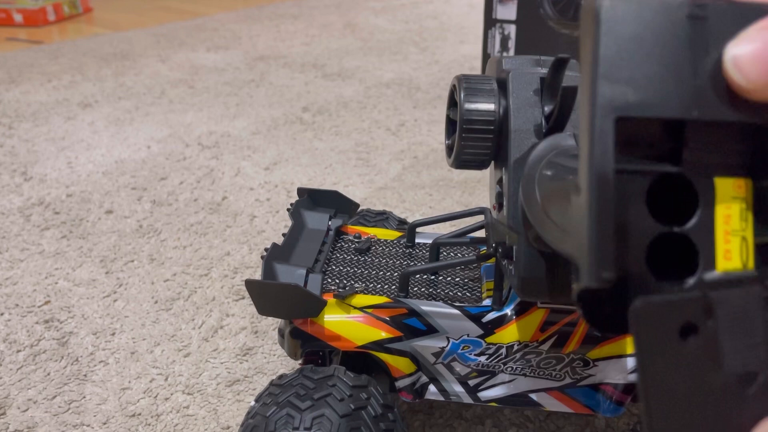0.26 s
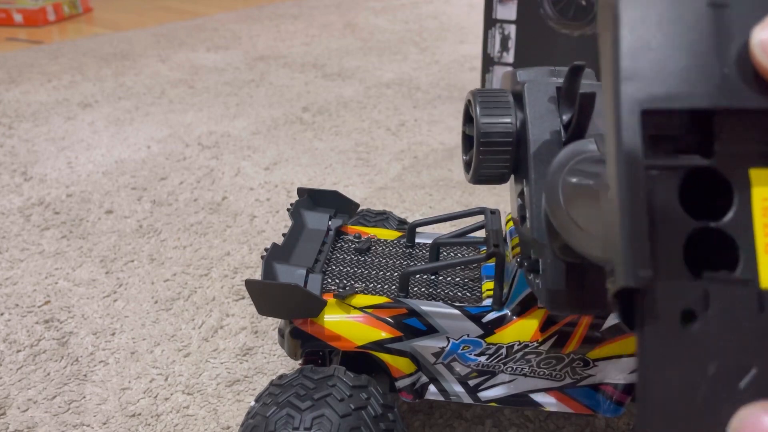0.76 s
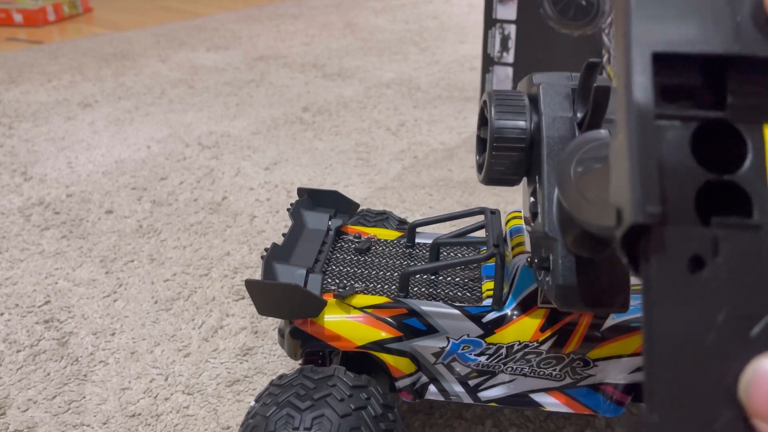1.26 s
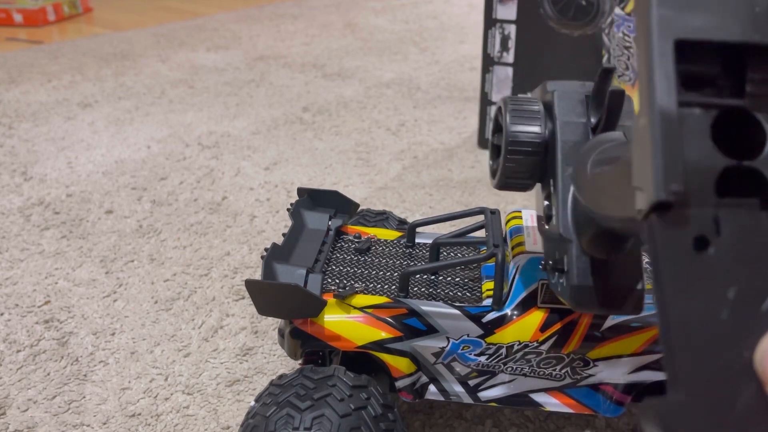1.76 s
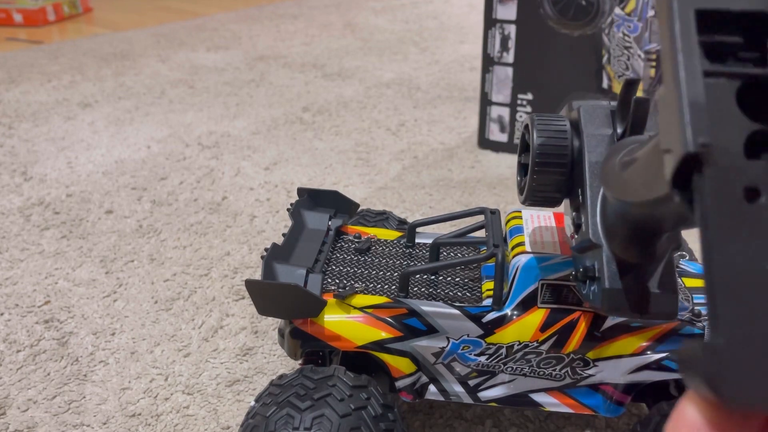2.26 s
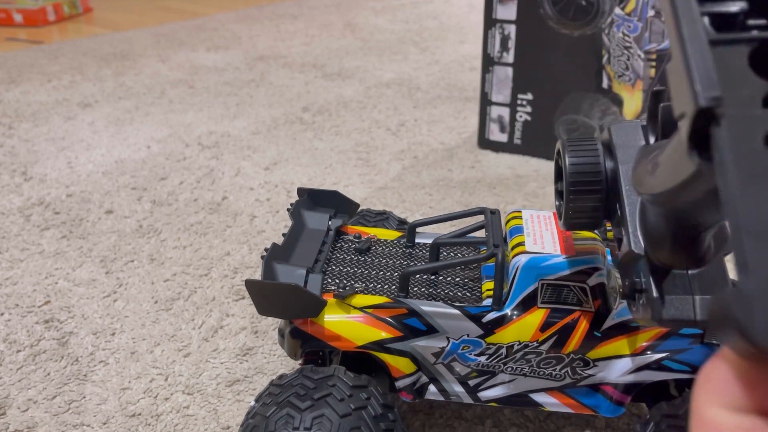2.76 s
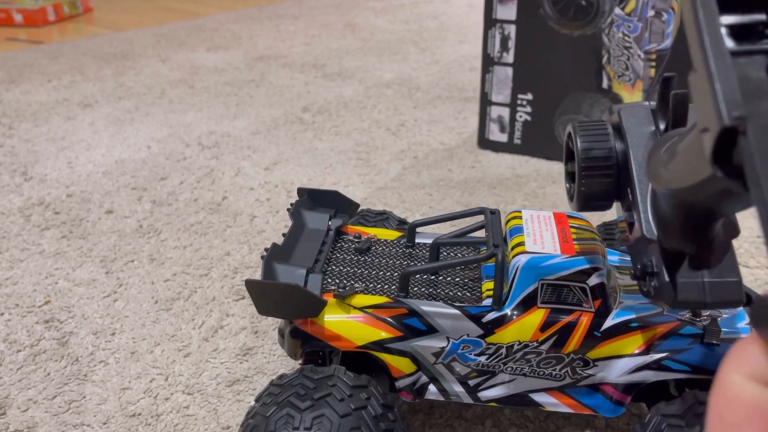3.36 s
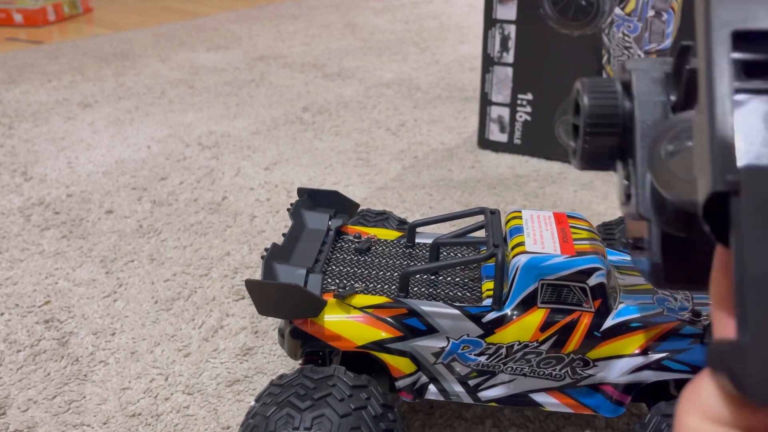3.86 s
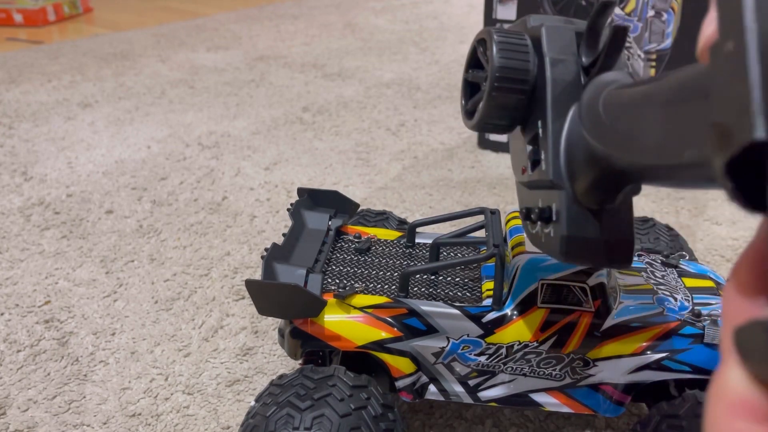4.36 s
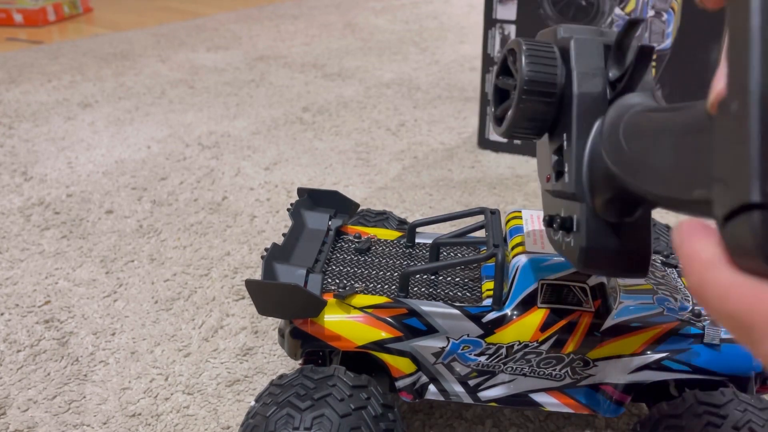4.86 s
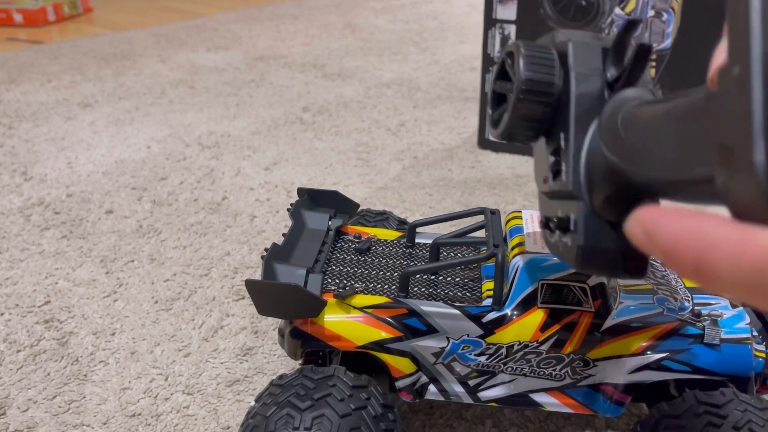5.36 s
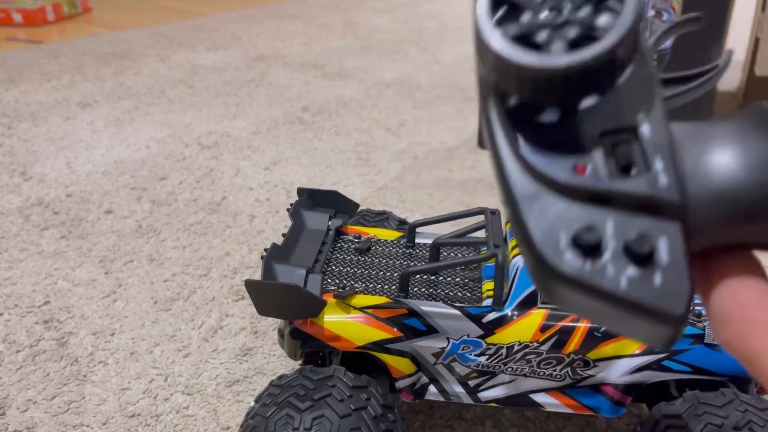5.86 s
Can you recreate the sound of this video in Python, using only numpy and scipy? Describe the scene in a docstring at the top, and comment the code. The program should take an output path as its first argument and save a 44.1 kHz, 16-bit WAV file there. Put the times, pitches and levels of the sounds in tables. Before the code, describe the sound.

Hands turn a hollow plastic toy controller, with small clicks and rubbing, until its battery lid releases with one loud crack.

```python
"""A quiet carpeted room: close by, hands turn a hollow plastic toy controller and work its battery lid off.
The shell snaps and ticks, fingers and lid slide over it, and the latch lets go with one loud crack.
Each contact is a force that rings the damped modes of the plastic.
Behind it: soft far thumps, ventilation hum and hiss, and a low rumble."""
import sys
import numpy as np
from scipy import signal
from scipy.fft import rfft, irfft, next_fast_len
from scipy.io import wavfile

SR = 44100
rng = np.random.default_rng(int(sys.argv[2]) if len(sys.argv) > 2 else 0)


def to_wav(sig):
    """Store sig (one row per channel, or 1-D mono) as 16-bit WAV at the path in sys.argv[1].

    Samples outside -1..1 are clipped; the rate is SR.
    """
    pcm = np.clip(np.atleast_2d(sig), -1, 1) * 32767
    pcm = np.round(pcm).astype(np.int16)
    wavfile.write(sys.argv[1], SR, pcm.T)  # frames by channels


N = 269010
LATCH_S = 5.1478
OFF = -np.inf   # dB: family not driven


def snaps(rings):
    """The shell gives with a click and chatters; weak ticks are longer, duller scuffs."""
    # Each row: time in seconds, level in dB, cavity, case, ribs and edges in dB re walls, pitch ratio.
    events = [(0.4679, -19.5, -7.5, -24, 0, -7, 0.93), (0.4747, -33.5, -3, 1, -8, -15, 0.88),
              (0.6082, -24, -5, -11, 5, 4, 0.91), (0.6263, -28, -3.5, -9.5, 4, -3, 0.88),
              (0.6425, -48, 8, -2, 2, 3, 1.052), (0.6927, -26.5, -12, -18, 4, 5, 0.94),
              (0.7339, -35.5, 8.5, -1, -3, -4, 0.91), (0.7412, -37, 8.5, -6, -2, -8, 1.1),
              (0.7507, -33.5, 3, -4, -1.5, 1.5, 0.88), (0.7681, -40, 7.5, 9.5, -1.5, -5, 1.04),
              (0.8663, -56, 6, 9, -12, -12, 1.02), (0.9993, -48, 6, 3.5, -8, -5, 0.99),
              (1.021, -38, 5, 3, -4, -7, 0.93), (1.0436, -27, 1, 9, -7, -11.5, 1),
              (1.084, -45.5, 4, -13, -10, -1, 1), (1.1611, -50, 4, 4.5, 1.5, -5.5, 0.96),
              (1.2192, -47, 5.5, 7, -2, -3.5, 1.02), (1.288, -52, -0.5, 8, 0.5, -6, 0.88),
              (1.3401, -55, 4, 6.5, -0.5, -1.5, 1), (1.5823, -39.5, 0, 2, -14, -10.5, 1.02),
              (1.6323, -43, -16, -5, -3, -13, 1.03), (1.709, -58, 11, 9.5, -9.5, -26, 0.89),
              (1.732, -36.5, -8, -22, -8.5, -13.5, 1.23), (1.7574, -56, 4.5, 6, -1.5, 4.5, 1),
              (1.8173, -50, -1, -12.5, 1.5, -5.5, 0.94), (1.8342, -40, 5, 8, -4, -5.5, 1),
              (2.052, -63.5, -2.5, -1, -1.5, 7, 1.04), (2.1313, -45.5, -0.5, -1, -4.5, -3, 0.99),
              (2.2825, -43, 10.5, -6, -6, -6, 1.02), (2.3929, -54, 13, 8, -1.5, -11, 0.92),
              (2.5197, -61, 4, 3, -3.0, 1, 0.92), (2.55, -38.5, 1, 6.5, -2, -9.5, 0.96),
              (2.625, -46.5, 5.5, -1, 5.5, -7, 1.12), (2.6994, -54, -7, 7.5, -2.5, 2, 0.97),
              (2.8165, -57, -1, -16, 4, -4, 1.001), (2.8354, -36.5, -3.5, 3, 0, -2, 0.9),
              (2.8422, -41, -2.5, -4, 3, -3, 1.14), (2.8955, -34.5, -9, -12, 3.5, 6, 0.94),
              (2.9595, -48.5, -1.5, 7.5, -0.5, -14, 1.03), (3.038, -74.5, -6, 8, -7, -13, 1.04),
              (3.4415, -43, -11.5, -20, 2, 3, 0.88), (3.6157, -55.5, -18, 13, -0.5, 0.5, 1.09),
              (3.695, -59, -10.5, 10, 5, 2, 0.98), (3.744, -54, -6, 10, 2, 1, 0.98),
              (3.844, -53, -20.5, -6, -11, 1.5, 1), (4.061, -48, -4, -2.5, 3.5, 4.5, 1.1),
              (4.157, -60, -16, -20, -2, -21, 0.97), (4.251, -49, -9, -6, -1, -6, 1.01),
              (4.2664, -41.5, -25, 1.5, -7, 2.5, 0.99), (4.433, -45, -2, 2, 8, 5.5, 1.04),
              (4.5293, -53.5, -15, 5, 5, 6, 1.28), (4.561, -57.5, -12, -5, 5, 17.5, 0.79),
              (4.602, -55, -8, 7, -4, -6, 1.031), (4.6903, -45, -5, -2.5, -8.5, -2, 0.93),
              (4.717, -47, -1, -8, 2.0, 12, 1), (4.748, -39.5, -7, -13, 9.5, 18, 1.1),
              (4.844, -40, 0.5, -24, 6.5, 11, 0.96), (4.941, -74, -18.5, -11, -4.5, 26, 1.04),
              (5.1465, -16, -2.5, 2, 3.5, -0.5, 1.13), (5.1482, -20.5, -9.5, -7.5, 3, 7.5, 1.0),
              (5.416, -46.5, -4, -20, -15.5, -33, 1), (5.456, -58.5, -12, -14, 3, -6, 1.6),
              (5.7707, -47, 0, 1.5, -4, -1, 0.89), (5.8868, -58, -4, 3.5, 6, 17, 1.06)]
    lead_in_s, chatter_rise_s, chatter_t60_s = .004, .00084, .018
    out, t = np.zeros((2, N)), np.arange(2000) / SR
    lead = round(lead_in_s * SR)
    lead_in = amp(-23 - 18 * np.arange(lead, 0, -1) / lead)   # a faint noise swell leads into each click
    for s, level_db, cavity_db, case_db, ribs_db, edges_db, pitch in events:
        soft = np.clip((-44 - level_db - max(edges_db, 0)) / 21.5, 0, 1)
        age_s = t / (1 + .5 * soft)
        noise = rng.standard_normal(len(t))
        force = .49 * noise * amp(-60 * age_s / chatter_t60_s) * np.minimum(age_s / chatter_rise_s, 1)
        force[44] += 3 * (1 - soft)   # release click, 1 ms in
        force = np.concatenate([lead_in * noise[-lead:], force])
        force = (1 - soft) * force + soft * dull(force)
        colour_db = [0, cavity_db, case_db, ribs_db, edges_db, OFF, cavity_db - 14]
        drive(out, s - lead_in_s, amp(level_db) * force, rings, colour_db, pitch)
    return out


def latch(rings):
    """The latch lets go: one impulse into the edges and the whole lid."""
    out = np.zeros((2, N))
    drive(out, LATCH_S, [1], rings, [OFF, OFF, OFF, OFF, 4.5, OFF, 3])
    return out


def slides(rings):
    """Fingers and lid stroke the shell; micro-slips ring it."""
    # Each row: start, rise, hold and fall in seconds, level in dB,
    # cavity, ribs, edges and grip in dB re walls, pitch ratio.
    strokes = [(.382, 0.1, .001, .01, -61.5, -5.5, -3, 2.5, -13, 1.08),
               (1.023, 0.012, 0.0011, 0.048, -55, 3, -3, 0, -2, 0.92),
               (1.616, 0.014, 0.0093, 0.025, -57.5, 5, -2, 4.5, -6, 1),
               (1.788, 0.037, 0.0012, 0.0064, -61.5, 3, -3, 5, -12, 1.1),
               (2.261, 0.023, 0.0011, 0.015, -61.5, 12.5, 0, 2.5, -11, 1.04),
               (2.461, 0.028, 0.0011, 0.017, -73.5, -9, -2, 12.5, -2, 0.92),
               (2.598, 0.018, .001, 0.19, -72, 5, 1, 8, 0, 1),
               (2.803, 0.021, .001, 0.017, -61.5, -3, 2, 7, -4, 1.05),
               (3.315, 0.016, 0.00073, .03, -75.5, -4, -3, 7.5, -3, 0.9),
               (3.415, 0.031, 0.0074, 0.061, -59, -1.5, -0.5, 10, -3.5, 0.92),
               (3.6, 0.018, 0.033, 0.14, -67.5, -6, 2, 7, -2, 0.97),
               (3.795, 0.0064, 0.011, 0.02, -73.5, -6, -5.5, -2.5, 6, 1.08),
               (3.949, 0.043, .001, .011, -60.5, -5.5, -8, 5.5, 1.5, 1.04),
               (3.993, 0.017, 0.013, 0.0094, -44, -29, -12, 1.5, 6, 1.033),
               (4.146, 0.011, .001, 0.01, -67, -19.5, 0, 12.5, -6, 1.01),
               (4.241, 0.03, 0.0012, 0.012, -60, 2.5, 0, 11.5, 3, 1.1),
               (4.364, 0.056, 0.014, 0.0098, -55.5, -6.5, -6, 14.5, 3, 1.03),
               (4.518, 0.041, .001, 0.14, -70.5, -4, 7, 11, 1, 1.1),
               (4.696, 0.051, 0.018, 0.017, -44, -9.5, 1.5, 11, -0.5, 0.96),
               (5.138, 0.009, 0.00085, 0.0012, -37.5, -10.5, 0, 4, -8, 0.9),
               (5.429, 0.032, .001, 0.018, -66.5, -9, 4, 9, -4, 0.85),
               (5.668, 0.03, 0.036, 0.031, -61, -3.5, -4.5, 8, -3.5, 0.88),
               (5.766, 0.026, .001, 0.072, -62.5, -6.5, 2.5, 12.5, -3, 0.99)]
    out = np.zeros((2, N))
    slips = grit(per_s=4500, spread_db=4.5)
    slips = .45 * slips + .55 * dull(slips)
    for start_s, rise_s, hold_s, fall_s, level_db, cavity_db, ribs_db, edges_db, grip_db, pitch in strokes:
        corners_s = np.cumsum([0, rise_s, hold_s, fall_s])
        stroke = np.interp(np.arange(round(corners_s[-1] * SR)) / SR, corners_s, [0, 1, 1, 0])
        force = amp(level_db) * stroke * slips[round(start_s * SR):][:len(stroke)]
        colour_db = [0, cavity_db, cavity_db + 1.5, ribs_db, edges_db, grip_db, OFF]
        drive(out, start_s, force, rings, colour_db, pitch)
    return out


def rubbing(rings):
    """Skin rubs faintly on the shell with fine, dense slips."""
    # Each row: time in seconds, level in dB.
    level_curve = [(0.0, -96.5), (0.41, -95.5), (0.5, -71), (0.78, -73.5), (0.9, -83.5), (1.15, -83),
                   (1.22, -77), (1.4, -90), (1.75, -79), (1.9, -92), (2.15, -82.5), (2.4, -87.5),
                   (2.9, -82), (3.05, -92), (3.46, -91.5), (3.75, -81), (3.9, -87), (4.06, -77),
                   (4.2, -85.5), (4.5, -85), (4.79, -67.5), (4.9, -87.5), (5.14, -88.5), (5.2, -71.5),
                   (5.3, -63.5), (5.5, -75), (5.62, -77.5), (5.86, -72.5), (5.92, -71), (6.04, -75.5),
                   (6.1, -95)]
    # Gains in dB on walls, cavity, case, ribs, edges, grip.
    colour_db = [-1, -8.5, -3.5, -4, 4, -0.5]
    out = np.zeros((2, N))
    level_db = np.interp(np.arange(N) / SR, *np.transpose(level_curve))
    drive(out, 0, amp(level_db) * dull(grit(per_s=12000, spread_db=2)), rings, [*colour_db, OFF])
    return out


def lid_knocks(rings):
    """A fingertip's smooth push knocks the lid dully."""
    # Each row: start in seconds, level in dB.
    knocks = [(4.2685, -46), (4.4155, -44), (4.7380, -49)]
    out, contact_s = np.zeros((2, N)), .0025
    for s, level_db in knocks:
        drive(out, s, -np.hanning(round(contact_s * SR)), rings, [OFF] * 6 + [level_db])
    return out


def grit(per_s, spread_db):
    """Random micro-slips of uneven size, catching unevenly; rms 1."""
    catches_per_s, catch_db = 150, 2.5
    sizes = amp(spread_db * np.minimum(rng.exponential(1, N), 4)) * rng.choice([-1, 1], N)
    catch = np.interp(np.arange(N) / SR * catches_per_s, np.arange(SR), rng.standard_normal(SR))
    return rms_one(sizes * amp(catch_db * catch) * (rng.random(N) < per_s / SR))


def shell_rings():
    """Impulse responses of the seven mode families, in the order of every colour_db."""
    # Modes. Each row: frequency in Hz, t60 in seconds, relative level in dB.
    walls = [(2150, 0.013, -1), (2360, 0.016, 3.5), (2550, 0.022, 1.5), (2845, .014, 2),
             (3030, 0.026, -0.5)]
    cavity = [(712, 0.074, -3.5), (879, 0.04, 2.5), (1180, 0.029, 4), (1367, 0.038, -9.5)]
    case = [(1638, 0.025, 1.5), (1824, 0.022, 3), (2066, 0.024, -5)]
    ribs = [(3810, 0.022, -3), (3860, 0.026, 4.5), (4620, 0.01, 0), (5050, 0.019, -5.5)]
    edges = [(6530, 0.011, -2.5), (6470, 0.014, 1.5), (7750, 0.0046, 0), (8300, 0.0087, 4.5),
             (9300, 0.0066, -5.5), (9250, 0.01, -7.5), (9820, 0.014, -2)]
    grip = [(1987, 0.016, -0.5), (2640, 0.065, 2), (3890, 0.0043, -5.5), (4977, 0.015, -3),
            (5580, 0.023, -0.5), (6580, 0.0085, -7.5)]   # hollow between hand and shell
    lid = [(196, 0.08, -11.5), (300, 0.035, -15), (424, 0.02, -9.5), (578, 0.032, 0), (727, 0.023, 2),
           (990, 0.0051, -4.5), (1357, .035, 2.5), (1470, 0.018, -7)]
    return np.array([ring(walls, 1792, 3600, contact_db=-3.5),
                     ring(cavity, 300, 2000, contact_db=-9.5, carries=True),
                     ring(case, 1300, 2100, contact_db=-11.5),
                     ring(ribs, 3100, 5910, contact_db=1),
                     ring(edges, 4600, 17000, contact_db=-5),
                     ring(grip, 1600, 7000, contact_db=-28.5),
                     ring(lid, 140, 1100, contact_db=-12, carries=True)])


def ring(modes, low_hz, high_hz, contact_db, carries=False):
    """Contact click plus damped modes; rows: near sound, all-round average; unit energy each."""
    impulse = signal.unit_impulse(6000)
    contact = band(band(impulse, low_hz, high_hz), low_hz, high_hz)
    near = amp(contact_db) * contact
    for k, (hz, t60_s, level_db) in enumerate(modes):
        r, w = amp(-60 / (t60_s * SR)), 2 * np.pi * hz / SR
        mode = signal.lfilter([1 - r, 0, r - 1], [1, -2 * r * np.cos(w), r * r], impulse)
        near += (-1) ** k * amp(level_db) * mode
    all_round = near if carries else contact   # only low modes carry all round
    return near / np.linalg.norm(near), all_round / np.linalg.norm(all_round)


def drive(out, s, force, rings, colour_db, pitch=1):
    """A force rings the families into out; the hand's squeeze shifts some in pitch."""
    parts, size = amp(colour_db)[:, None, None] * rings, rings.shape[-1]
    flexing = parts[[0, 2, 3, 5]].sum(axis=0)   # walls, case, ribs, grip
    padded = np.pad(flexing, ((0, 0), (0, size)))
    shifted = signal.resample(padded, next_fast_len(round(2 * size / pitch)), axis=1)[:, :size]
    sound = signal.fftconvolve([force], parts.sum(axis=0) - flexing + shifted, axes=1)
    i = round(s * SR)
    out[:, i:i + sound.shape[1]] += sound[:, :N - i]


def ports(x):
    """A near source reaches two microphone ports with frequency-dependent phase and level."""
    # Each row: frequency in Hz, phase lead of the left port in radians.
    phases = [(100, 0), (600, -.5), (1300, -.1), (2400, .3), (4400, .65), (7700, .9), (8700, 0),
              (9500, -1.8), (10200, -3.1), (11500, -5.2), (12500, -6.0)]
    # Each row: frequency in Hz, left minus right in dB, common gain in dB.
    levels = [(100, -2.5, -2.5), (300, 2.5, -2.35), (520, -5, -1), (800, -3, 0.47), (1340, -3.5, 0.85),
              (2580, 2.5, 3), (4660, 2, 0), (7060, 3, 1.05), (8940, -9.5, 4.5), (10930, -5, 4),
              (11780, -3.5, -15), (12900, -3, -25), (14600, -2, -40), (15300, -1, -20.5)]
    size = next_fast_len(N + 4096)
    hz = np.fft.rfftfreq(size, 1 / SR)
    lead_rad, = at_hz(phases, hz)
    balance_db, common_db = at_hz(levels, hz)
    side = np.array([[.5], [-.5]])
    response = amp(common_db + side * balance_db) * np.exp(1j * side * lead_rad)
    return irfft(rfft(x, size) * response, size)[:, :N]


def room(x):
    """A diffuse tail builds up and dies band by band."""
    # Each row: frequency in Hz, t60 in seconds, relative level in dB.
    decays = [(310, .13, -6.5), (600, 0.65, 2.5), (900, 0.61, -3), (1240, 0.7, 0), (1930, 0.39, -2.5),
              (2650, .45, -4.5), (3270, 0.39, 2.5), (4500, .36, -2), (9080, 0.25, 4)]
    tail_db, build_s = -20, .0051
    t = np.arange(int(.75 * SR)) / SR

    def decay(hz):
        t60_s, level_db = at_hz(decays, hz)
        return amp(level_db - 60 * t / t60_s)

    edges_hz = 150 * 2 ** np.arange(0, 6.6, 1 / 3)
    tail = stereo_bands(len(t), edges_hz, likeness=lambda hz: .51, gain=decay)
    tail = dull(tail) * np.minimum(t / build_s, 1)
    tail *= amp(tail_db) / np.sqrt(np.sum(tail ** 2) / 2)
    return signal.fftconvolve(x, tail, axes=1)[:, :N]


def thumps():
    """Each far thump rises quickly, sags in pitch and dies."""
    # Each row: start in seconds, level in dB, mid-glide frequency in Hz.
    events = [(1.196, -53, 206.4), (1.379, -45, 209.5), (3.569, -48.5, 172.5), (3.796, -38.5, 196),
              (3.93, -45, 213), (3.977, -43, 191.4), (4.019, -47.5, 189), (4.145, -45.5, 175),
              (4.413, -49, 198), (4.931, -43.5, 202.3), (5.859, -45.5, 283)]
    rise_s, t60_s, sag, sag_s = .0031, .125, .28, .0384
    out, t = np.zeros(N), np.arange(SR // 4) / SR
    for s, level_db, hz in events:
        glide_hz = hz * (1 - sag / 2 + sag * np.exp(-t / sag_s))
        envelope = amp(level_db - 60 * t / t60_s) * (1 - np.exp(-t / rise_s))
        tone = envelope * np.sin(2 * np.pi * np.cumsum(glide_hz) / SR)
        i = round(s * SR)
        out[i:i + len(t)] += tone[:N - i]
    return out


def ventilation():
    """Steady hum and hiss: third-octave noise, more diffuse in the treble."""
    # Each row: frequency in Hz, relative spectral density in dB.
    spectrum = [(120, -35), (200, -17.5), (259, -13), (364, -9.5), (411, -9), (496, -7.5), (550, 1.5),
                (609, -5.5), (748, -10.5), (967, -30), (5100, -42.5), (6370, -30.5), (10300, -45.5),
                (11200, -32), (12000, -44), (15600, -74), (22000, -120)]
    # Each row: frequency in Hz, left-right correlation.
    likeness = [(200, 0.93), (640, 0.35), (1400, .1), (8000, .05)]
    edges_hz = 200 * 2 ** np.arange(0, 5.9, 1 / 3)
    hum = stereo_bands(N, edges_hz, lambda hz: at_hz(likeness, hz)[0],
                       lambda hz: amp(at_hz(spectrum, hz)[0]))
    return amp(-64) * rms_one(hum)


def rumble():
    """Three low noise bands wander in level under droning swells; nearly alike in both channels."""
    # Each row: low edge in Hz, high edge in Hz, level in dB.
    bands = [(40, 58, -71.5), (81, 104, -72), (107, 216, -70.5)]
    # Each row: centre in seconds, length in seconds, level in dB, centre frequency in Hz.
    swells = [(0.369, 0.4, -55, 89), (.7, .15, -66, 159), (0.75, .4, -72, 54.3), (0.802, 0.19, -60.5, 92),
              (1.139, .25, -59.5, 96), (1.5, 0.23, -59, 158.5), (1.529, 0.22, -55, 53.9),
              (1.567, .2, -56.5, 95), (1.899, 0.49, -60.5, 52.2), (2.101, 0.41, -61, 94.2),
              (2.3, 0.43, -63.5, 54.2), (2.554, 0.207, -65.5, 51.8), (2.9, .3, -62.5, 53.4),
              (3.13, 0.21, -61.5, 93.1), (3.161, .2, -60.5, 54.3), (3.35, .2, -63.5, 52.7),
              (3.7, 0.18, -61.5, 155.5), (3.819, 0.23, -63, 53), (3.99, .2, -53.5, 146),
              (4.031, 0.16, -53.5, 53), (4.259, 0.2, -46.5, 61), (4.33, 0.34, -58, 171),
              (4.393, 0.15, -57, 91.5), (4.48, 0.36, -53.5, 62.7), (4.788, 0.18, -61, 52.7),
              (5.114, 0.35, -60, 51.2), (5.131, 0.26, -64.5, 92.2), (5.365, .15, -64.5, 52.7),
              (5.859, .25, -59, 52.3)]
    wander_db, wander_per_s, side_db = 3.5, 7.3, -14.5
    edge_ratio, swell_trim_db = 1.16, -2
    t, mid_side = np.arange(N) / SR, np.zeros((2, N))
    for low_hz, high_hz, level_db in bands:
        wander = np.interp(t * wander_per_s, np.arange(100), rng.standard_normal(100))
        noise = rms_one(band(rng.standard_normal((2, N)), low_hz, high_hz))
        mid_side += amp(level_db + wander_db * wander) * noise
    for centre_s, length_s, level_db, hz in swells:
        i, size = round((centre_s - length_s / 2) * SR), round(length_s * SR)
        noise = rms_one(band(rng.standard_normal((2, SR)), hz / edge_ratio, hz * edge_ratio)[:, -size:])
        drone = rms_one(noise / (np.abs(signal.hilbert(noise)) + .4))   # evens out the level
        swell = amp(level_db + swell_trim_db) * signal.windows.tukey(size, .7) * drone
        mid_side[:, i:i + size] += swell[:, :N - i]
    return mid_side[0] + amp(side_db) * mid_side[1] * [[1], [-1]]


def stereo_bands(length, edges_hz, likeness, gain):
    """Noise bands, each with its own gain(hz) and left-right likeness(hz)."""
    out, white = 0, rng.standard_normal((2, 2, length))
    for k, (low_hz, high_hz) in enumerate(zip(edges_hz, edges_hz[1:])):
        mid, side = band(white[k % 2], low_hz, high_hz)
        hz = np.sqrt(low_hz * high_hz)
        alike = likeness(hz)
        out = out + gain(hz) * (np.sqrt(1 + alike) * mid + np.sqrt(1 - alike) * side * [[1], [-1]])
    return out


def amp(db):
    """Decibels to gain."""
    return 10 ** (np.asarray(db) / 20)


def rms_one(x):
    """Scale to unit rms."""
    return x / np.sqrt(np.mean(x ** 2) + 1e-20)


def at_hz(rows, hz):
    """Columns of a spectrum table at the given frequencies."""
    row_hz, *columns = np.transpose(rows)
    return [np.interp(np.log(hz + 1), np.log(row_hz), c) for c in columns]


def band(x, low_hz, high_hz):
    """Butterworth band-pass."""
    return signal.sosfilt(signal.butter(2, [low_hz, high_hz], "band", fs=SR, output="sos"), x)


def dull(x, stop_hz=10494):
    """Steep low-pass near 10 kHz: dulls rubbing, slides, soft ticks and the room tail."""
    return signal.sosfilt(signal.cheby2(8, 40, stop_hz, fs=SR, output="sos"), x)


def scene():
    """Near handling with its room tail, over the background."""
    rings = shell_rings()
    near, all_round = snaps(rings) + latch(rings) + slides(rings) + rubbing(rings) + lid_knocks(rings)
    # The crack is heard with a louder room tail than the ticks.
    send_db = 5 * (np.abs(np.arange(N) / SR - LATCH_S) < .012)
    return ports(near) + room(ports(all_round) * amp(send_db)) + thumps() + ventilation() + rumble()


def record(dry):
    """The port pair has one null in its sum, one in its difference; peaks are rounded, the top is cut."""
    mid_null_hz, side_null_hz, stop_hz, ceiling = 10300, 8680, 16000, 1.1
    mid = signal.lfilter(*signal.iirnotch(mid_null_hz, 12, SR), dry[0] + dry[1]) / 2
    side = signal.lfilter(*signal.iirnotch(side_null_hz, 9, SR), dry[0] - dry[1]) / 2
    rounded = ceiling * np.tanh(np.array([mid + side, mid - side]) / ceiling)
    return signal.sosfilt(signal.cheby2(12, 70, stop_hz, fs=SR, output="sos"), rounded)


dry = scene()
out = record(dry)
to_wav(out)
```